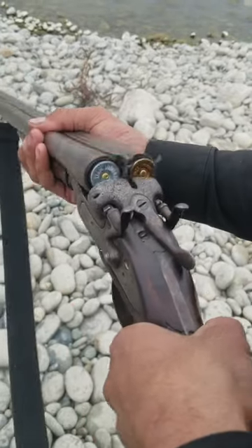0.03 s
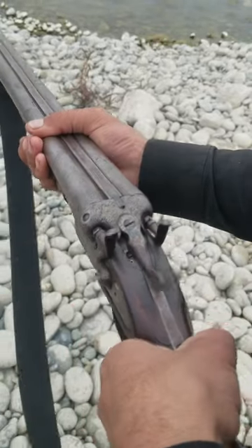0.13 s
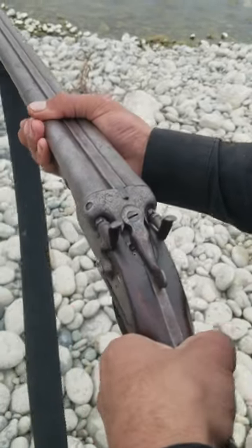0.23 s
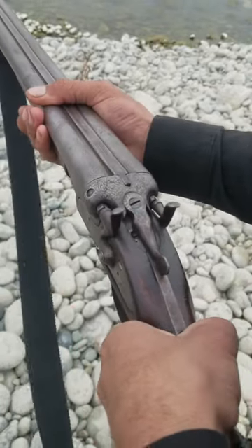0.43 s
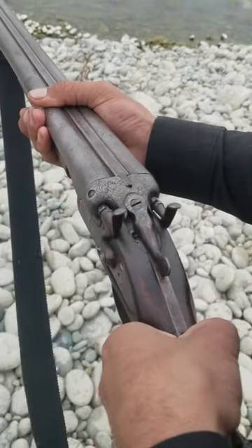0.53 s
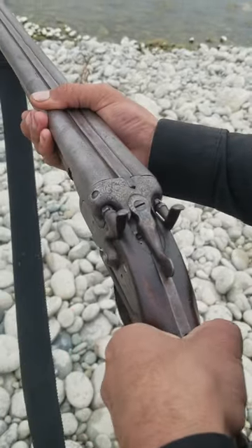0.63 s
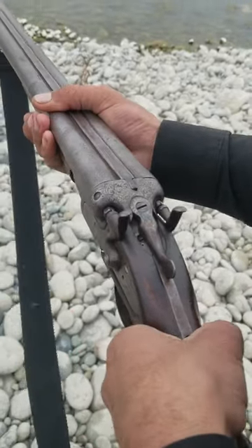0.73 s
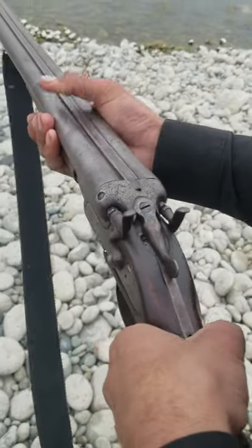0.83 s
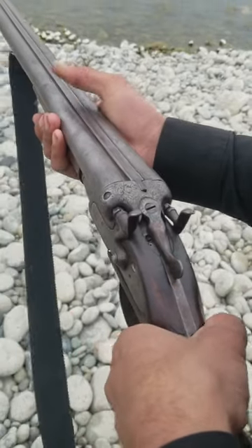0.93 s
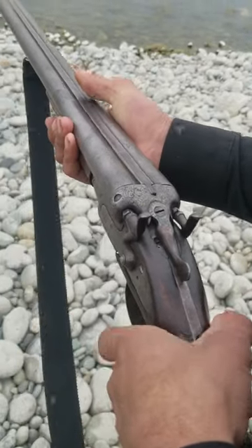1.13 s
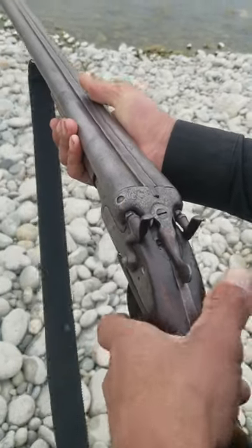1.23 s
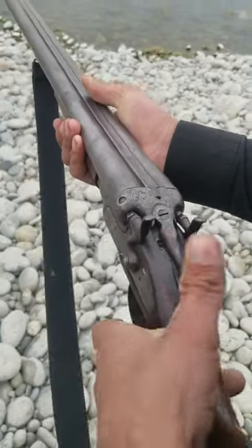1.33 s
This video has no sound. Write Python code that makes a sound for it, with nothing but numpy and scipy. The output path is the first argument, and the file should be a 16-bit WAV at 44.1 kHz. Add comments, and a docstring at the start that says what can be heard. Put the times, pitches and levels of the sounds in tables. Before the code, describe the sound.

One sharp steel clack as a shotgun is closed outdoors, faint water and wind behind.

```python
"""Closing a shotgun on a pebble shore

A break-action shotgun is swung shut close to the microphone. The hinge scrapes, the shells and the bolt
tick, then the barrels slam home, rebound and ring briefly; the pebbles scatter the sound back.
Behind it are a dull wash of water, wind, faint hollow moans, a high trill and a hand on the stock."""
import sys
import numpy as np
from scipy import signal
from scipy.fft import rfft, irfft
from scipy.io import wavfile
from scipy.ndimage import uniform_filter1d

SR = 44100
rng = np.random.default_rng(int(sys.argv[2]) if len(sys.argv) > 2 else 0)


def store_wav(level_fs):
    """Save 16-bit WAV to argv[1]."""
    pcm = np.round(np.clip(np.atleast_2d(level_fs), -1, 1) * 32767)
    wavfile.write(sys.argv[1], SR, pcm.T.astype(np.int16))


N = 61739
TIME = np.arange(N) / SR


def amp(db):
    """Amplitude ratio of a level in decibels."""
    return 10 ** (np.asarray(db) / 20)


def unit(x):
    """Normalisation to an rms of 1."""
    return x / np.sqrt(np.mean(x ** 2) + 1e-20)


def at_frequency(points, hz):
    """Interpolation on a logarithmic frequency axis."""
    f, value = np.transpose(points)
    return np.interp(np.log(hz + 1), np.log(f + 1), value)


def envelope(points):
    """Amplitude envelope through points of t/s, level/dB."""
    return amp(np.interp(TIME, *np.transpose(points)))


def decay(t, t60):
    """Exponential damping: 60 dB in t60 seconds."""
    return np.exp(-np.log(1000) * t / np.maximum(t60, 1e-3))


def add(mix, start, sound):
    """Superposition of a sound on the mix, from start in seconds."""
    part = mix[max(round(start * SR), 0):][:len(sound)]
    part += sound[:len(part)]


def colour(x, spectrum, size=4096):
    """Minimum-phase filtering: the phase follows from the log gain by a Hilbert transform."""
    log_gain = np.log(amp(at_frequency(spectrum, abs(np.fft.fftfreq(size, 1 / SR)))))
    taps = np.fft.ifft(np.exp(np.conj(signal.hilbert(log_gain)))).real
    return signal.fftconvolve(x, taps[:size // 2])[:len(x)]


def noise(spectrum, patchy_db, size=512):
    """Coloured noise, randomly modulated in patches of time and frequency."""
    cells = signal.stft(rng.standard_normal(N), nperseg=size)[2]
    patches = uniform_filter1d(rng.standard_normal(cells.shape), size=5, axis=0)
    patches = unit(uniform_filter1d(patches, size=10, axis=1))
    patchy = signal.istft(cells * amp(patchy_db * patches), nperseg=size)[1][:N]
    gain = amp(at_frequency(spectrum, np.fft.rfftfreq(N, 1 / SR)))
    return unit(irfft(rfft(patchy) * gain, N))


def burst(shape):
    """A broadband transient: noise evened out by turns in spectrum and in short-time power."""
    x = rng.standard_normal(len(shape))
    for _ in range(5):
        x = irfft(np.exp(1j * np.angle(rfft(x * shape))), len(x))
        x = x / np.sqrt(abs(uniform_filter1d(x ** 2, size=24)) + 1e-14)
    return x * shape


def damped_tones(rows, rise_s):
    """Free vibration of damped oscillators, each with a soft onset."""
    out, t = np.zeros(N), np.arange(SR // 2) / SR
    rise = 1 - np.exp(-(t / rise_s) ** 2)
    for start, db, hz, t60 in rows:
        add(out, start, amp(db) * rise * decay(t, t60) * np.sin(2 * np.pi * hz * t))
    return out


def water():
    """The wash of water is random noise with a slowly varying spectrum."""
    # strength of the wash (t/s, level/dB)
    levels = [(0, -65.5), (.25, -67.5), (.45, -69.5), (.7, -70.5), (1.0, -70.5), (1.2, -71), (1.4, -70.5)]
    # its spectrum (f/Hz, relative level/dB)
    spectrum = [(100, -7.5), (270, -4.5), (350, -17), (800, -15.5), (1120, -19.5), (1300, 0), (1450, -0.5),
                (1700, -3.5), (2050, -11.5), (2400, -0.5), (2750, -8), (3200, -37.5), (4600, -36.5),
                (6000, -24.5), (8500, -47.5), (10500, -31.5), (12500, -23.5), (15800, -28)]
    return envelope(levels) * noise(spectrum, patchy_db=2.0)


def wind():
    """Turbulent pressure fluctuations at the microphone make a low rumble."""
    # gusts (t/s, level/dB)
    gusts = [(0.0, -61), (0.026, -57), (0.05, -69), (0.244, -57.5), (0.366, -68.5), (0.392, -62.5),
             (0.424, -68), (0.598, -78), (0.638, -62.5), (0.672, -73), (0.836, -70), (0.996, -65.5),
             (1.078, -72), (1.246, -66), (1.268, -76.5), (1.4, -66.5)]
    # spectrum of the rumble (f/Hz, relative level/dB)
    spectrum = [(15, -20), (35, -9), (70, -0.5), (100, -9.5), (150, -15), (250, -23), (380, -43.5),
                (1500, -70.5)]
    return envelope(gusts) * noise(spectrum, patchy_db=1.0)


def whistle(width_hz=170, db=-75):
    """Wind excites one wandering resonance: narrow-band noise, heard as a breathy whistle."""
    # centre of the resonance (t/s, f/Hz)
    centre = [(0, 1443), (0.328, 1427), (0.428, 1594), (.5, 1459), (0.629, 1479), (.8, 1398), (1.4, 1430)]
    hz = np.interp(TIME, *np.transpose(centre))
    pole = np.exp(-np.pi * width_hz / SR)
    air = rng.standard_normal(N) + 1j * rng.standard_normal(N)
    for _ in range(2):
        air = signal.lfilter([1 - pole], [1, -pole], air)
    carrier = np.exp(2j * np.pi * np.cumsum(hz) / SR)
    return amp(db) * unit((air * carrier).real)


def rubs():
    """Sliding friction of hand and sleeve on the gun gives Gaussian swells of noise."""
    # strokes (centre t/s, standard deviation/s, level/dB)
    strokes = [(0.03, .08, -106), (.35, .09, -79), (1.208, 0.053, -72.5), (1.4, .05, -76)]
    # friction spectrum (f/Hz, relative level/dB)
    spectrum = [(100, -3.5), (500, 3.5), (1000, -2.5), (2500, 10.5), (3500, -9), (6500, -1.5), (9000, -13),
                (12500, -1.5), (16000, -12.5)]
    swells = sum(amp(db) * np.exp(-.5 * ((TIME - centre) / width) ** 2) for centre, width, db in strokes)
    return noise(spectrum, patchy_db=0.5) * swells


def moans():
    """Gliding pure tones swell and fade; the first is perhaps air resonating in the open barrels."""
    # hollow tones (t/s, duration/s, f/Hz, glide/Hz, level/dB)
    tones = [(.005, 0.16, 241.8, 15.5, -65.5), (0.647, 0.16, 670, -0.5, -85.5),
             (0.809, .14, 295.2, -8, -75), (0.948, 0.13, 299.3, -5, -75.5), (1.16, .13, 479.3, 11.5, -77.5)]
    out = np.zeros(N)
    for start, length, hz, glide_hz, db in tones:
        progress = np.arange(0, length, 1 / SR) / length
        phase = 2 * np.pi * np.cumsum(hz + glide_hz * progress) / SR
        add(out, start, amp(db) * np.sin(np.pi * progress) * np.sin(phase))
    return out


def hinge(slips_per_s=4000, spread_db=7):
    """Stick-slip friction: tiny random slips of steel on steel grow as the barrels swing up."""
    # strength of the scrape (t/s, level/dB)
    levels = [(0, -99), (.09, -77.5), (.135, -66), (.15, -58), (.166, -57.5), (.185, -53.5), (.21, -59.5),
              (.24, -61), (.27, -89.5)]
    # spectrum of a slip (f/Hz, relative level/dB)
    spectrum = [(100, -8.5), (400, -4.5), (900, -1), (1600, -5.5), (2700, 0), (4500, -12), (8000, -13.5),
                (13000, -18), (16000, -26)]
    sizes = amp(spread_db * np.minimum(rng.exponential(1, N), 3)) * rng.choice([-1, 1], N)
    slips = sizes * (rng.random(N) < slips_per_s / SR)
    return envelope(levels) * unit(colour(slips, spectrum))


def contacts(attack_s=0.00055, ring_db=-23, mode_spread=.007):
    """Impact excitation: each metal contact gives a broadband crack and rings the steel's modes."""
    # impacts as the action closes (t/s, level/dB, bass gain/dB, treble gain/dB, crack T60/s)
    impacts = [(0.099, -44, -7, -9.5, 0.017), (0.1464, -32, -7, -17, 0.016),
               (0.154, -36.5, -2.5, -14.5, 0.013), (0.1614, -40, -5, -20.5, .01),
               (.1698, -42.5, -6.5, 4, 0.024), (0.1858, -30.5, 5, -23.5, .012),
               (0.1902, -31, -14, -3.5, 0.0063), (0.1934, -40.5, -6.5, -15, 0.013),
               (0.1995, -34.5, 6.5, 2, 0.008), (0.2055, -26.5, -1.5, 2, 0.0068),
               (0.209, -30, -1.5, -4.5, .016), (0.2121, -13, 1.5, 2.5, 0.011), (0.2145, -19, 2.5, -2, .01),
               (0.2187, -32, -2, -2, .016), (0.22, -31.5, 0, 3.5, 0.016), (0.2396, -47, 3, -6.5, .012)]
    # spectrum of steel striking steel (f/Hz, relative level/dB)
    spectrum = [(40, -21.5), (300, -17), (900, -7), (1450, -14), (2150, -2.5), (2700, -3), (3450, -5.5),
                (3950, 4), (4380, -1), (4750, -12.5), (5300, -6), (6300, -3.5), (7500, -10.5), (9000, -8.5),
                (10000, -1), (10800, -11.5), (11700, 0.5), (13250, 0.5), (14400, -16), (15200, -6.5),
                (16000, -18.5)]
    # normal modes of the barrels and action (f/Hz, relative level/dB, T60/s)
    modes = [(942, -4, .035), (1162, -1, 0.042), (1886, -7, 0.042), (2011, -4, .048), (2330, 3, 0.046),
             (2425, -5, 0.041), (2900, -8, .035), (3910, -11.5, .02), (6200, -6, .035), (6763, -8.5, .035),
             (9960, -9, .03), (11686, -7.5, 0.033), (12500, -4.5, .032)]
    out, t = np.zeros(N), np.arange(8192) / SR
    rise = np.minimum(t / attack_s, 1)
    for start, db, bass_db, treble_db, t60 in impacts:
        crack = colour(burst(rise * decay(np.maximum(t - attack_s, 0), t60)), spectrum)
        # each contact loads the steel differently and shifts its modes
        detune = 1 + mode_spread * rng.standard_normal(len(modes))
        ring = sum(amp(mode_db) * decay(t, mode_t60) * np.sin(2 * np.pi * (k * hz * t + rng.random()))
                   for k, (hz, mode_db, mode_t60) in zip(detune, modes))
        tone = [(898.5, bass_db), (1870, 0), (3240, 0), (7954, treble_db)]  # f/Hz, gain/dB
        add(out, start, amp(db) * colour(crack + amp(ring_db) * rise * ring, tone))
    return out


def shore(sound, delay_s=0.0043, near_db=-13, far_db=-38.5, far_t60_s=0.47):
    """Diffuse reflection: a quick scatter off the pebbles and a very faint longer tail."""
    # decay of the scattered sound (f/Hz, T60/s)
    scatter = [(200, .13), (1000, .095), (4000, 0.049), (7000, 0.086), (14000, 0.039)]
    hz, t, cells = signal.stft(rng.standard_normal(SR // 2), SR, nperseg=128)
    near = signal.istft(cells * decay(t, at_frequency(scatter, hz)[:, None]))[1]
    far = rng.standard_normal(len(near)) * decay(np.arange(len(near)) / SR, far_t60_s)
    response = amp(near_db) * near / np.linalg.norm(near) + amp(far_db) * far / np.linalg.norm(far)
    out = np.zeros(N)
    add(out, delay_s, signal.fftconvolve(sound, response))
    return out


def knocks():
    """Heavily damped resonances of the shells, barrels and stock sound as the action seats."""
    # hollow knocks (t/s, level/dB, f/Hz, T60/s)
    resonances = [(.1422, -45.5, 943, 0.032), (.147, -41.5, 2470, 0.012), (.177, -35.5, 888, 0.0077),
                  (.186, -34, 748.3, .008), (.1868, -26, 2136, 0.0066), (.194, -37, 2347, 0.01),
                  (.2022, -37, 877, 0.021), (.206, -33, 980, 0.0095), (.2117, -39, 437.7, 0.0078),
                  (.2138, -19, 2130, .007), (.2208, -31, 1859, .013)]
    return damped_tones(resonances, rise_s=0.00061)


def jolts():
    """The whole gun jolts in the hands: a damped low-frequency oscillation."""
    # low thuds (t/s, level/dB, f/Hz, T60/s)
    thuds = [(.178, -58, 60, .08), (.212, -42.5, 75, .05), (.2335, -41.5, 60, 0.1),
             (1.215, -59.5, 67.3, 0.32)]
    return damped_tones(thuds, rise_s=0.0033)


def trills(period_s=.0338, note_s=.013, top_hz=6030, max_drop_hz=700, db=-88):
    """Frequency modulation: far trills of uneven falling notes, perhaps a small bird."""
    # trills (start t/s, end t/s)
    spans = [(.495, .89), (1.003, 1.08)]
    out, progress = np.zeros(N), np.arange(0, note_s, 1 / SR) / note_s
    for start, end in spans:
        for onset in np.arange(start, end, period_s):
            pitch, strength = rng.standard_normal(2)
            hz = top_hz * (1 + .01 * pitch) - max_drop_hz * rng.random() * progress ** 2
            phase = 2 * np.pi * np.cumsum(hz) / SR
            add(out, onset, amp(db + 2 * strength) * np.sin(np.pi * progress) * np.sin(phase))
    return out


def scene():
    """Superposition of the gun, its reflections and the surroundings in one channel."""
    gun = contacts() + knocks() + hinge()
    handling = jolts() + rubs()
    return (gun + shore(gun) + handling + trills() + moans() + whistle() + water() + wind())[None]


def record(dry, cutoff_hz=15950):
    """Band limiting by a linear-phase low-pass filter."""
    taps = signal.firwin(301, cutoff_hz, window=("kaiser", 8), fs=SR)
    return signal.oaconvolve(dry, taps[None], "same")


dry = scene()
out = record(dry)
store_wav(out)
```